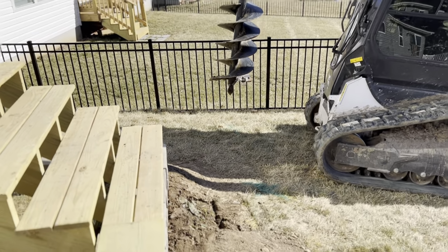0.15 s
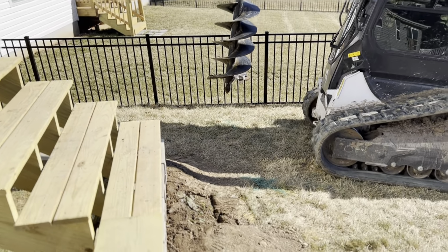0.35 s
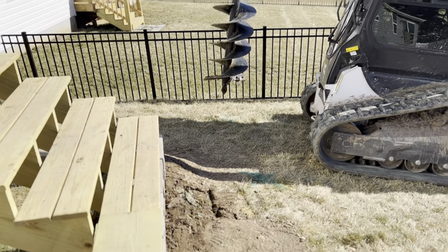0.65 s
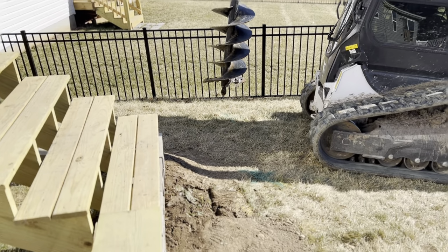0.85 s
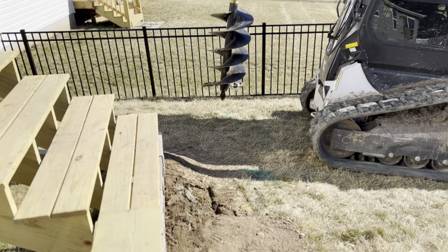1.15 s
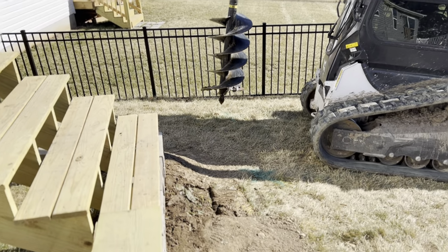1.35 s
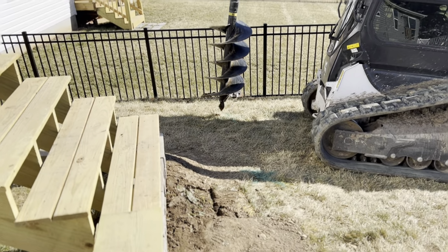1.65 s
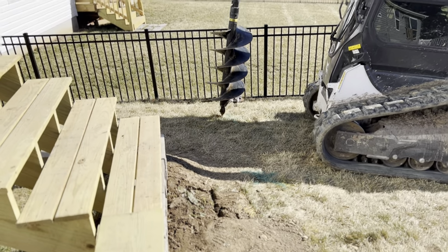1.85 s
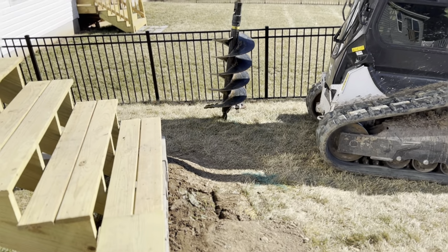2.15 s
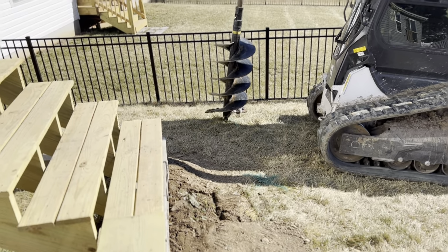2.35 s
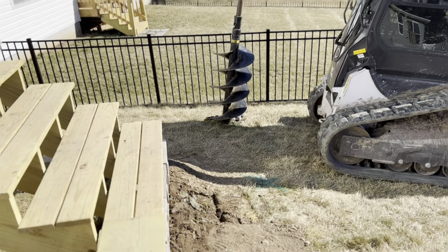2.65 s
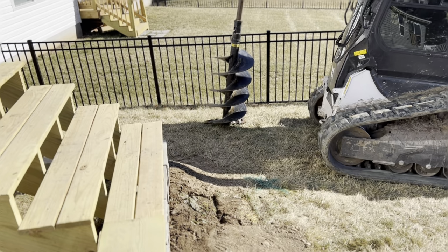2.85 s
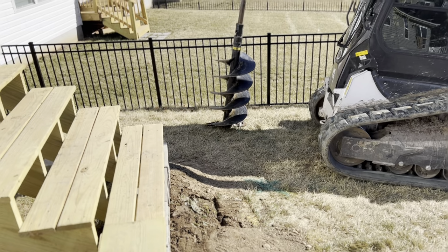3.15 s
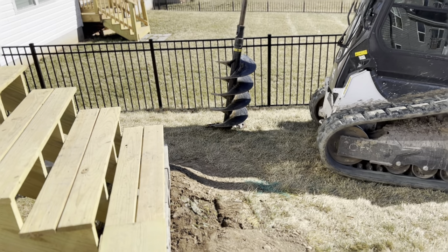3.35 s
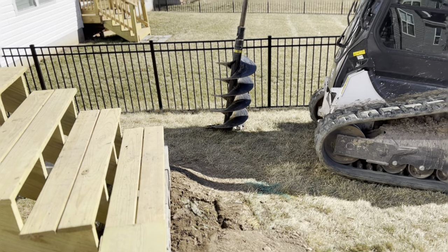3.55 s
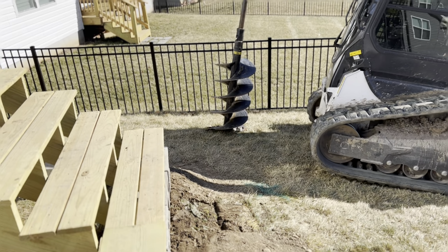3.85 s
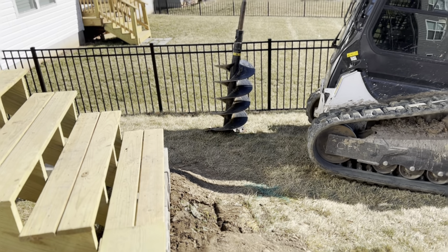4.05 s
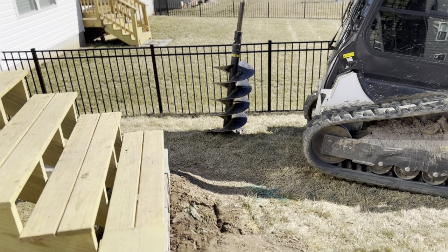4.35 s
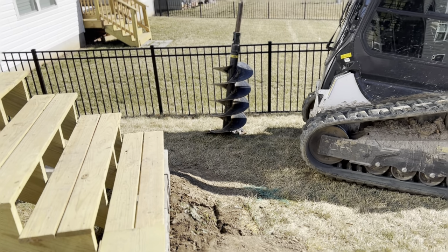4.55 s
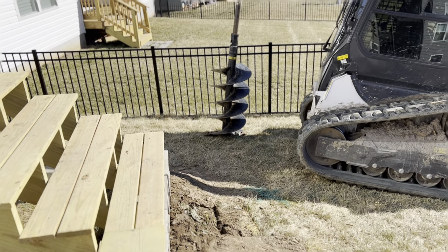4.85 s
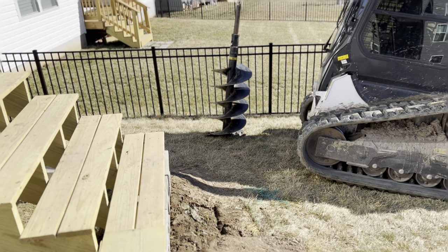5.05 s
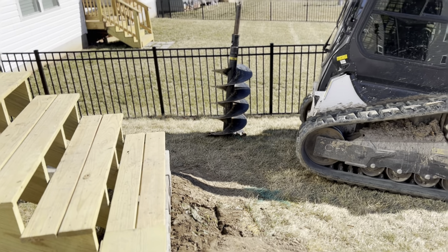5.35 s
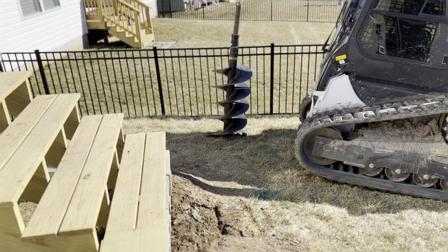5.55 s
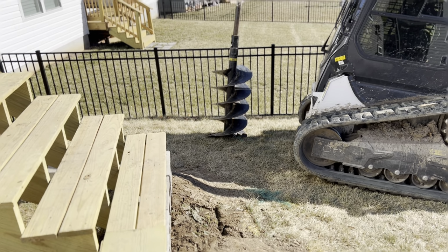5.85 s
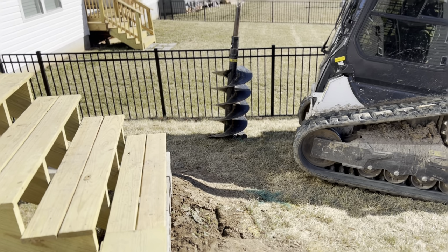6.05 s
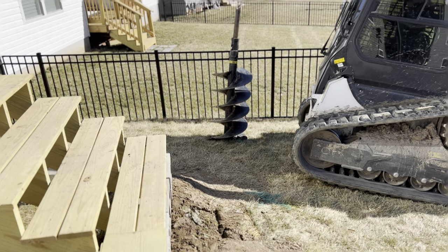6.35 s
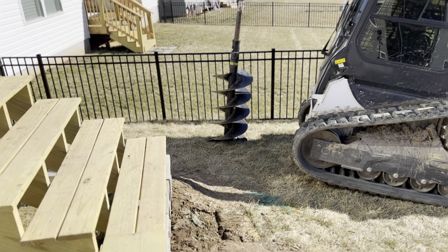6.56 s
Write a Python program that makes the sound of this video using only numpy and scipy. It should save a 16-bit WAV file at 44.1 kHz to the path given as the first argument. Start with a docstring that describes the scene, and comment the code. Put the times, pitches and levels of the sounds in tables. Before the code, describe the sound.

A diesel loader drones steadily at high revs while its hydraulics whine harder, with a few dull metal knocks as the auger meets the ground.

```python
"""Diesel loader lowering an auger

A four-cylinder diesel holds high revs while hydraulics lower an auger, heard by a phone a few metres off.
Firings hum as crank multiples; pump ripple, locked to the crank, whines harder under load.
Fan and combustion roar as shaped noise, valves and gears clatter in a pattern repeated each cycle.
The steel frame knocks as decaying modes as the auger meets the ground; a loose panel booms briefly."""
import sys
import numpy as np
from scipy import signal
from scipy.fft import rfft, irfft
from scipy.io import wavfile
from scipy.ndimage import uniform_filter1d

SR = 44100
rng = np.random.default_rng(int(sys.argv[2]) if len(sys.argv) > 2 else 0)


def inscribe(sig):
    """Save sig as 16-bit PCM at rate SR to the path in sys.argv[1].

    A 1-D sig is mono; a 2-D sig holds one channel per row.
    Samples are clipped to [-1, 1] before scaling.
    """
    pcm = np.round(np.clip(np.atleast_2d(sig).T, -1, 1) * 32767)
    wavfile.write(sys.argv[1], SR, pcm.astype(np.int16))


N = 295911
T = np.arange(N) / SR

# crank speed: (t/s, turns per s)
SPEED = [(0, 43.13), (.7, 43.26), (2.08, 43.42), (2.45, 43.29), (2.68, 43.44), (3.1, 43.36), (3.36, 43.2),
         (3.57, 43.3), (3.68, 43.88), (4.05, 43.58), (4.2, 43.24), (4.6, 43.27), (4.93, 43.57),
         (5.05, 43.36), (5.37, 43.17), (5.55, 43.34), (5.74, 43.32), (5.85, 42.96), (6.12, 43.13),
         (6.27, 42.88), (6.36, 43), (6.5, 43.95), (6.71, 43.87)]
# pump ripple, crank multiples: piston, gear, whine, second gear, third piston, whine overtones 2-4
PUMP_MULTIPLES = (9, 10, 18, 20, 27, 36, 54, 72)
# high whines of the nine-piston and ten-tooth pumps, crank multiples
WHINE_MULTIPLES = (63, 81, 90, 130, 140, 150, 160, 170, 180)


def undb(db):
    """Gain of a level in dB."""
    return np.exp(np.asarray(db) * np.log(10) / 20)


def between(start, end, share):
    """Linear move from start to end as share goes 0-1."""
    return start + share * (end - start)


def curves(table):
    """Columns of a table after its time column, interpolated to one value per sample."""
    s, *columns = np.transpose(table)
    return [np.interp(T, s, c) for c in columns]


def walk(rate_hz):
    """Random levels held 1 / rate_hz and smoothed twice; spread 1."""
    hold = int(SR / rate_hz)
    steps = np.repeat(rng.standard_normal(N // hold + 1), hold)
    smooth = uniform_filter1d(uniform_filter1d(steps, hold), hold)[:N]
    return smooth / smooth.std()


def pair(angle, lag_rad, pan_db):
    """Sine at both ports, rms 1 before pan; left lags by lag_rad, left minus right is pan_db."""
    left = undb(pan_db / 2) * np.sin(angle - lag_rad)
    right = undb(-pan_db / 2) * np.sin(angle)
    return np.sqrt(2) * np.array([left, right])


def ports(near, far):
    """Both ports share the direct sound with a left lag; the left also takes unrelated reflections."""
    # microphone ports: (f/Hz, likeness 0-1, left lag/rad, left minus right/dB)
    port_table = [(30, 0.92, 0.4, -2), (201, 0.93, 0.7, 5.5), (597, 0.98, 0.77, -2.5),
                  (1110, 0.37, 0.6, 6.5), (1410, 0.72, 2, -0.5), (2060, 0.64, 1.5, -4), (2460, 0.67, 0, -3),
                  (2860, 0, -2, -1), (3130, 0.9, -4, -1), (3650, 0.23, -1.5, 1), (4300, 0.87, -5, 0.5),
                  (4690, 0.38, -2, 4.5), (5640, 0.57, -1.5, 8.5), (5900, 0.03, -2, -1.5)]
    port_table = [*port_table, (7600, .4, 1.6, 3), (8800, .7, 2.1, 0)]
    hiss_lag_s, hiss_from_hz, hiss_likeness = 1.47e-4, 9300, .995
    hz = np.fft.rfftfreq(N, 1 / SR)
    at, like, lag, pan_db = np.transpose(port_table)
    # above the table: one direct hiss with a plain time lag, so the ports' sum combs
    at = np.append(at, [hiss_from_hz, SR / 2])
    like = np.clip(np.interp(hz, at, np.append(like, [hiss_likeness] * 2)), 0, 1)
    lag = np.interp(hz, at, np.append(lag, 2 * np.pi * (at[-2:] * hiss_lag_s - 1)))
    pan = undb(np.interp(hz, at, np.append(pan_db, [0, 0])) / 2)
    direct = rfft(near)
    left = like * np.exp(-1j * lag) * direct + np.sqrt(1 - like ** 2) * rfft(far)
    return irfft(np.array([left * pan, direct / pan]), N)


def hum(turn, tone_db, load):
    """Crank multiples of the firing pattern through exhaust and body; upper ones waver more."""
    # running free, then loaded: (crank multiple, level re firing tone/dB)
    free = [(1, -41), (2, 0), (3, -15), (4, -10), (5, -9), (6, -15), (7, -4.5), (8, -22), (9, -12),
            (10, -16.5), (11, -21), (12, -20.5), (13, -11), (14, -22), (15, -22), (16, -15.5), (17, -24),
            (18, -19), (19, -31), (20, -13.5), (21, -24), (22, -14.5), (23, -24), (24, -18.5), (25, -23.5),
            (26, -25)]
    loaded = [(1, -37.5), (2, -1), (3, -15), (4, -16), (5, -12.5), (6, -17.5), (7, -11.5), (8, -18.5),
              (9, -6), (10, -12.5), (11, -30.5), (12, -24.5), (13, -25), (14, -27.5), (15, -23.5),
              (16, -26), (17, -27.5), (18, -7), (19, -46), (20, -22.5), (21, -29), (22, -26.5), (23, -28.5),
              (24, -20), (25, -24), (26, -20.5)]
    # cylinders differ, so the two-turn cycle adds 1.5, 2.5 .. 10.5: level re firing tone/dB
    half_db = [-35, -40, -66, -15, -21, -24, -20.5, -23, -47, -20.5]
    rows = [(k, free_db, busy_db) for (k, free_db), (_, busy_db) in zip(free, loaded)
            if k not in PUMP_MULTIPLES]
    rows += [(k, db, db) for k, db in zip(np.arange(1.5, 11), half_db)]
    out = 0
    for k, free_db, busy_db in rows:
        waver_db = (.35 + .03 * k) * walk(9)
        angle = k * turn + 2 * np.pi * rng.random() + 0.006 * k * walk(7)
        gain = undb(between(free_db, busy_db, load) + waver_db)
        out = out + gain * pair(angle, 0.041 * k, -1.3 + 0.02 * k)
    return out * undb(tone_db)


def ripple(load):
    """Gains of the ripple tones: rough groans lift piston and gear tones, pressure the whine."""
    # groans as the lift arms strain: (centre t/s, half length/s, piston peak/dB, gear peak/dB)
    groans = [(.2, .8, -33, -42), (1.75, .25, -35, -44), (3.5, .18, -31, -34), (3.95, .25, -32, -32),
              (4.37, .22, -24.5, -28.5), (4.88, .28, -30, -32), (5.28, .12, -32, -33),
              (5.46, .25, -23, -29.5), (5.9, .2, -34, -30), (6.28, .19, -27.5, -30)]
    # hydraulic pressure behind the whine: (t/s, pressure 0-1)
    pressure = [(0, 0), (.3, 0.06), (1.5, 0.3), (2.75, 0), (2.95, 0.58), (3.18, 0.74), (3.32, 1),
                (4.7, 0.98), (5.05, 0.82), (5.4, 0.88), (6.71, 0.81)]
    # second gear multiple: (t/s, level/dB)
    gear_second = [(0, -47), (.7, -38), (2.1, -39), (2.4, -36.5), (3.3, -37), (3.75, -48), (5.65, -48),
                   (5.85, -40.5), (6.35, -40), (6.5, -47)]
    # third piston multiple: (t/s, level/dB)
    third = [(0, -38), (1.95, -37.5), (2.75, -55), (3.5, -46), (3.7, -43.5), (4.45, -39), (4.85, -45),
             (5.3, -38), (6.05, -54), (6.45, -53), (6.65, -39)]
    # multiples of the whine: (t/s, second/dB, third/dB, fourth/dB)
    overtones = [(0, -49, -60, -61), (1.3, -46, -55, -61), (2.2, -51, -47, -54), (2.6, -43, -53, -50),
                 (2.75, -57, -61, -63), (3.0, -42, -50, -57), (3.2, -47, -54, -58), (3.4, -40, -45, -49),
                 (3.55, -48, -48, -47), (3.7, -53, -57, -58), (4.0, -57, -56, -59), (4.15, -57, -56, -55),
                 (4.33, -44, -46, -52), (4.7, -41.5, -46, -48), (4.8, -46, -41, -50), (4.95, -45, -47, -56),
                 (5.2, -42.5, -46, -50), (5.33, -44, -61, -57), (5.55, -46, -47, -56), (5.9, -50, -52, -53),
                 (6.3, -47, -46.5, -51), (6.5, -43, -51, -58), (6.71, -43, -48, -60)]
    groan = 0
    for s, half_s, piston_db, gear_db in groans:
        groan = groan + undb([[piston_db], [gear_db]]) * np.exp(-((T - s) / half_s) ** 2)
    piston = np.hypot(undb(between(-38.5, -38, load)), groan[0]) * (1 + .09 * walk(45))
    gear = np.hypot(undb(between(-46, -42, load)), groan[1]) * (1 + .17 * walk(45))
    whine = undb(between(-46, -26.5, np.clip(curves(pressure)[0], 0, 1)))
    return [piston, gear, whine, undb(curves(gear_second)[0]), undb(curves(third)[0]),
            *undb(curves(overtones))]


def pump(turn, load):
    """Pressure ripple of the pumps, locked to the crank; the high whines come and go."""
    # arrival of each ripple tone: (left lag/rad, left minus right/dB)
    pump_tones = [(-1.12, 2), (1, 0), (0.43, 0.5), (0.55, -4), (-1.2, -4), (1.3, -7.5), (-0.1, -4),
                  (4, -5.5)]
    # high whines: (free level/dB, loaded level/dB, left lag/rad, left minus right/dB)
    whines = [(-56, -45, 2.5, 2), (-62, -65, 5, -3), (-63, -62, 2.8, -1), (-65, -69, -1.5, 6),
              (-61, -64, -1.5, -2), (-75, -65, -0.5, 0), (-77, -70, -2.5, -3), (-68, -66, 2.5, 1),
              (-58, -70, 2, -1)]
    throb_per_multiple = .009
    out = 0
    for k, (lag_rad, pan_db), gain in zip(PUMP_MULTIPLES, pump_tones, ripple(load)):
        # tones above multiple 20 throb once a two-turn cycle
        throb = 1 + throb_per_multiple * k * (k > 20) * np.cos(turn / 2)
        waver = undb((.3 + 0.035 * k) * walk(12))
        out = out + gain * throb * waver * pair(k * turn + 0.004 * k * walk(9), lag_rad, pan_db)
    for k, (free_db, busy_db, lag_rad, pan_db) in zip(WHINE_MULTIPLES, whines):
        db = between(free_db, busy_db, load) + 2.5 * walk(5)
        out = out + undb(db) * pair(k * turn + 0.5 * walk(20), lag_rad, pan_db)
    return out


def ring(t, hz, t60_s, rise_s):
    """A mode pushed softly, then dying away."""
    decay = np.exp(-np.log(1000) * t / t60_s)
    return (1 - np.exp(-t / rise_s)) * decay * np.sin(2 * np.pi * hz * t)


def knocks():
    """Blows ring frame modes near their centre, with a metallic tick; thumps come through the ground."""
    # blows: (t/s, mode level/dB, centre f/Hz, base t60/s, tick noise level/dB)
    blows = [(4.221, -17, 350, .08, -60), (4.441, -18, 280, .08, -50), (4.462, -24, 400, .08, -60),
             (4.481, -12.5, 240, .14, -30), (4.504, -18.5, 400, .07, -60), (5.359, -20.5, 520, .07, -60),
             (5.375, -17, 280, .11, -60)]
    # frame modes: (f/Hz, level/dB, share of base t60)
    frame = [(105, 1, 2.2), (165, -4, 1.2), (255, 2, 1.2), (330, -3, 1), (415, -2, .9), (620, -3, .9),
             (760, -8, .8), (860, -3, .8)]
    # thumps: (t/s, level/dB, f/Hz, t60/s)
    thumps = [(3.95, -34, 45, .2), (5.44, -38, 45, .15), (5.592, -23, 55.3, 0.35), (6.47, -38, 40, .2)]
    out, ground, t = np.zeros(N), np.zeros(N), T[:SR // 2]
    tick_filter = signal.iirpeak(9000, 1.5, SR)
    for s, db, centre_hz, t60_s, tick_db in blows:
        chance = rng.standard_normal((len(frame), 2))
        tick = signal.lfilter(*tick_filter, rng.standard_normal(len(t)))
        blow = undb(tick_db) * tick * np.exp(-t / 0.0094)
        for (hz, mode_db, share), (detune, size_db) in zip(frame, chance):
            near_db = -2.5 * np.log2(hz / centre_hz) ** 2
            gain = undb(db + mode_db + near_db + size_db)
            blow += gain * ring(t, hz * (1 + .03 * detune), t60_s * share, .6 / hz)
        i = int(s * SR)
        out[i:i + len(t)] += blow[:N - i]
    for s, db, hz, t60_s in thumps:
        i = int(s * SR)
        ground[i:i + len(t)] += (undb(db) * ring(t, hz, t60_s, 0.003))[:N - i]
    return ports(out, np.roll(out, 90)) + ground


def booms():
    """A loose panel's resonance in short Gaussian swells."""
    # swells: (centre t/s, peak level/dB, f/Hz)
    swells = [(.23, -29, 430), (.47, -31, 433), (.59, -23, 428), (.82, -36, 425), (1.05, -28, 435),
              (1.262, -22.5, 428), (1.73, -25.5, 430), (2.2, -31, 422), (2.312, -31, 445), (2.47, -29, 433)]
    half_s = 0.035
    out = 0
    for s, db, hz in swells:
        swell = np.exp(-((T - s) / half_s) ** 2)
        out = out + undb(db) * swell * np.sin(2 * np.pi * hz * (T - s))
    return ports(out, np.roll(out, 90))


def clatter(turn):
    """Valves and gears repeat a noise pattern every two turns; it slowly turns into another."""
    size, pattern_s, fade_db, line_scatter_db = 4096, .8, 5.5, 3
    top_line = 190  # cycle multiple
    count = int(T[-1] / pattern_s) + 2
    # each cycle starts loud and fades
    fade = undb(fade_db * (.5 - np.arange(size) / size))
    lines = rfft(rng.standard_normal((count, 2, size)) * fade)
    # a few lines stand out
    strength = undb(line_scatter_db * rng.standard_normal((count, 1, size // 2 + 1)))
    lines *= strength / np.sqrt(np.mean(strength ** 2))
    # the hum owns the low lines, the pumps theirs
    lines[..., :22] = 0
    lines[..., :54:2] = 0
    lines[..., top_line:] = 0
    lines[..., [2 * k for k in (*PUMP_MULTIPLES, *WHINE_MULTIPLES[:2])]] = 0
    place = (turn + .012 * walk(12)) / (4 * np.pi) % 1 * size
    out = 0
    for k, pattern in enumerate(irfft(lines, size)):
        crossfade = np.sqrt(np.clip(1 - abs(T / pattern_s - k), 0, 1))
        played = [np.interp(place, np.arange(size), p, period=size) for p in pattern]
        out = out + crossfade * np.array(played)
    # as dense per Hz as white noise of rms 1
    return out * np.sqrt(2 * size * np.mean(SPEED, axis=0)[1] / 4 / SR)


def roar(turn, load):
    """Fan, combustion and clatter in octave bands that flicker alone; the noise pulses with each firing."""
    # relative spectrum, then its treble end: (f/Hz, density/dB per Hz)
    colour = [(25, -15), (60, -0.5), (120, -0.5), (300, 2), (600, -1), (1100, -1.5), (1800, -5),
              (3000, -15), (4400, -19.5), (6500, -20)]
    treble = [(7000, -21), (7800, -19), (9000, -22), (10000, -26), (11500, -25), (13000, -28),
              (14800, -31), (15600, -29)]
    # body resonances: (f/Hz, width/Hz, lift/dB)
    body = [(74, 18, 7.5), (113, 38, 8.5), (420, 42, 11.5), (1270, 210, -3), (1470, 260, 0), (2480, 310, 1),
            (3590, 900, 2.5), (5210, 930, 4.5), (5420, 30, -23)]
    # roar below the treble, as 1.3-3 kHz rms: (t/s, level/dB)
    roar_level = [(0, -33), (0.34, -31), (1.18, -32.5), (2.6, -33), (3.5, -33), (4.11, -34.5),
                  (4.82, -34.5), (5.96, -35.5), (6.5, -34), (6.71, -35.5)]
    treble_db = -33.5  # steady
    rumble_hz, rumble_free_db, rumble_loaded_db = 1300, -3.5, 0
    hz = np.fft.rfftfreq(N, 1 / SR) + 1
    colour_hz, density_db = np.transpose([*colour, *treble])
    colour_db = np.interp(np.log(hz), np.log(colour_hz), density_db)
    colour_db += sum(db * np.exp(-((hz - f) / w) ** 2 * 2) for f, w, db in body)
    level_db = curves(roar_level)[0]
    air = rng.standard_normal((2, N)) * (1 + 0.053 * np.cos(2 * turn))
    # random roar below rumble_hz is weaker while the hydraulics run free
    rumble = irfft(rfft(air) * (hz < rumble_hz), N)
    air += (undb(between(rumble_free_db, rumble_loaded_db, load)) - 1) * rumble
    clatter_db = 1.5  # re the random roar
    noise = rfft(air + undb(clatter_db) * clatter(turn)) * undb(colour_db)
    reference = noise[0, (hz > 1300) & (hz < 3000)]
    noise /= np.sqrt(2 * np.sum(abs(reference) ** 2)) / N
    out = 0
    for octave in np.arange(5, 15):  # centre 2 ** octave Hz
        share = np.clip(1 - abs(np.log2(np.maximum(hz, 32)) - octave), 0, 1)
        high = np.clip(octave - 11, 0, 1)
        flicker_db = (0.76 + 0.12 * high) * walk(18)
        band_db = between(level_db, treble_db, high) + flicker_db
        out = out + undb(band_db) * irfft(noise * share, N)
    return ports(*out)


def scene():
    """Hum, pump and roar follow the crank; knocks and booms have their own times."""
    # firing tone: (t/s, level/dB)
    engine = [(0, -23.5), (2.45, -23.5), (3.19, -24.5), (3.65, -22.5), (5.89, -21), (6.71, -22)]
    # hydraulic load: (t/s, load 0-1)
    load_table = [(0, 0.1), (3.45, 0.15), (3.7, 0.88), (6.71, 0.86)]
    turn = 2 * np.pi * np.cumsum(curves(SPEED)[0]) / SR  # crank angle, rad
    load = np.clip(curves(load_table)[0], 0, 1)
    machine = hum(turn, curves(engine)[0], load) + pump(turn, load)
    return machine + knocks() + booms() + roar(turn, load)


def record(dry):
    """The phone cuts the top with a steep elliptic low-pass."""
    top_hz, ripple_db, stop_db = 15730, .2, 70
    return signal.sosfilt(signal.ellip(16, ripple_db, stop_db, top_hz, fs=SR, output="sos"), dry)


dry = scene()
out = record(dry)
inscribe(out)
```